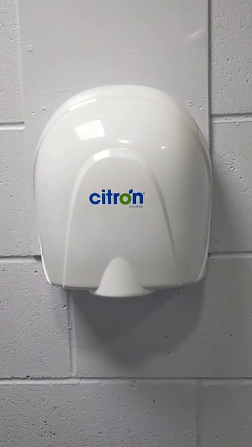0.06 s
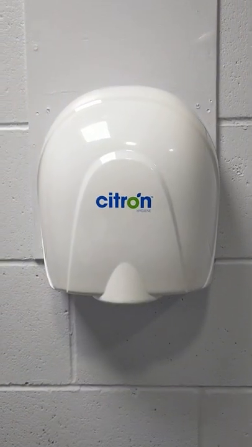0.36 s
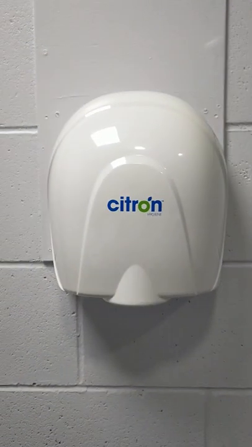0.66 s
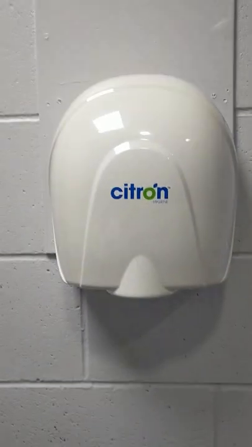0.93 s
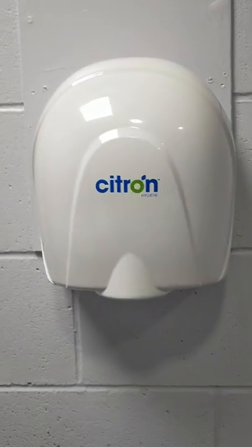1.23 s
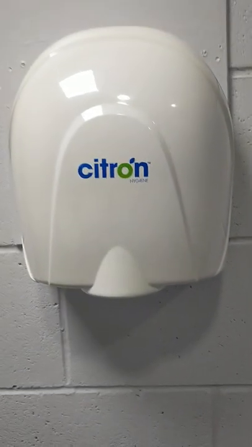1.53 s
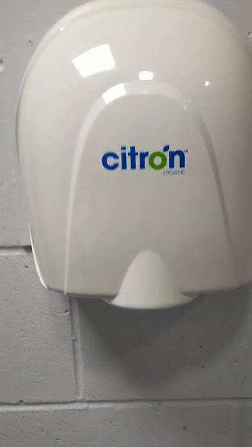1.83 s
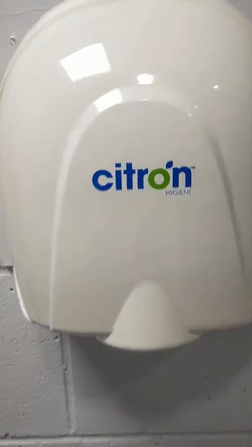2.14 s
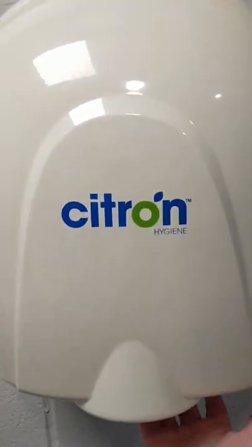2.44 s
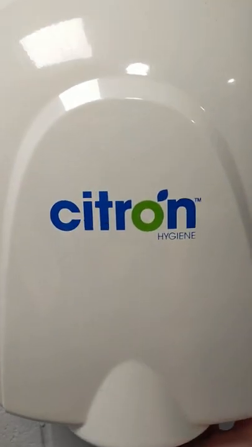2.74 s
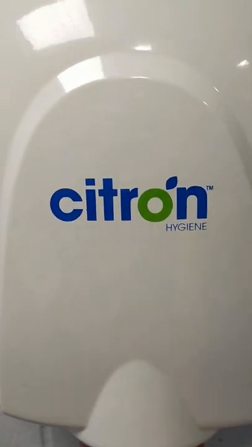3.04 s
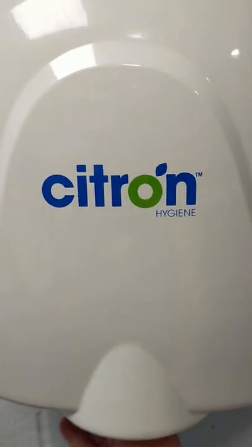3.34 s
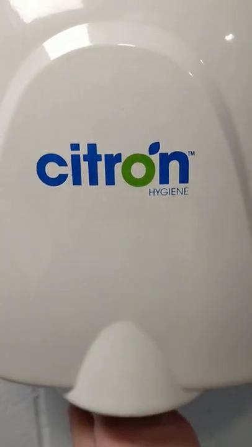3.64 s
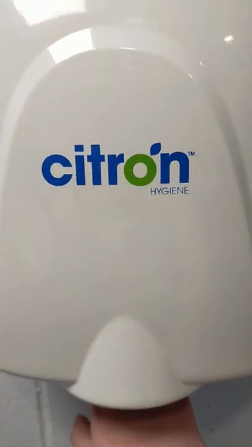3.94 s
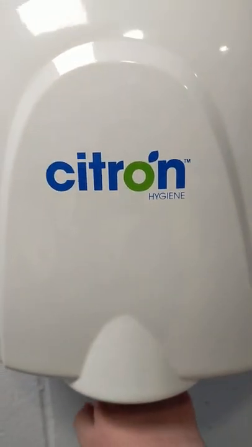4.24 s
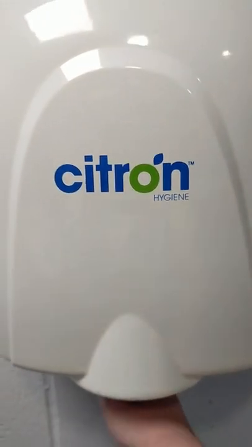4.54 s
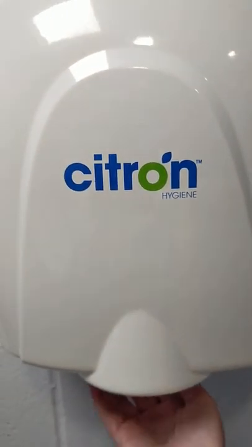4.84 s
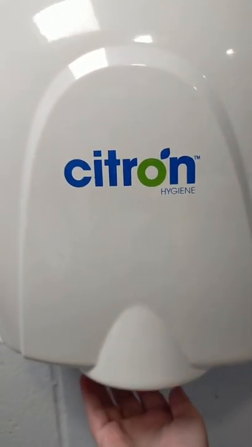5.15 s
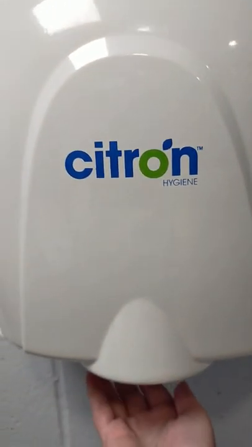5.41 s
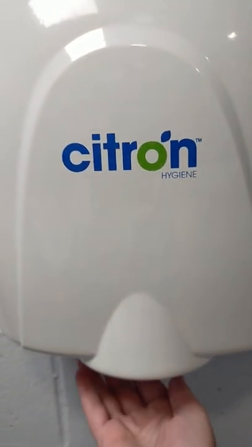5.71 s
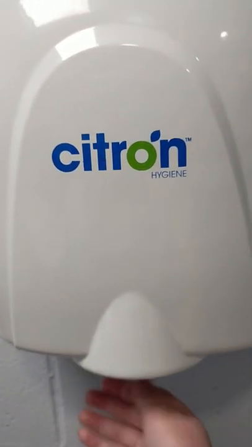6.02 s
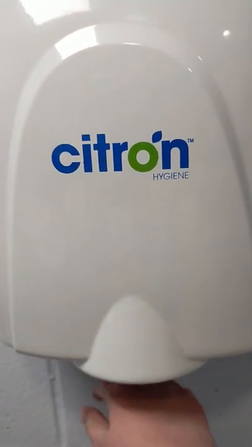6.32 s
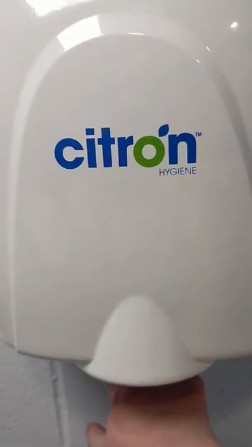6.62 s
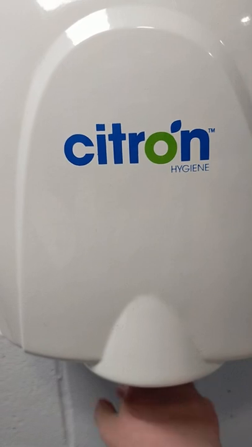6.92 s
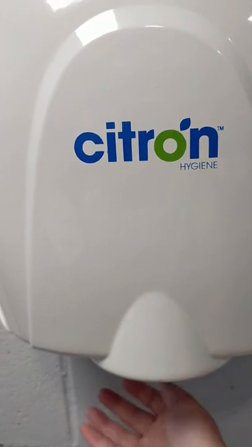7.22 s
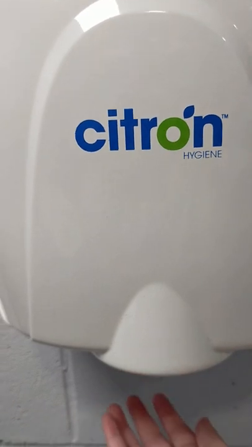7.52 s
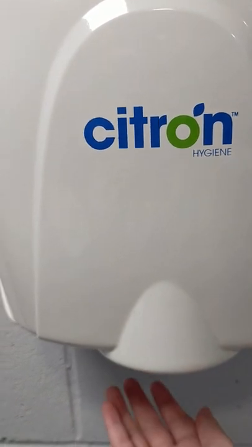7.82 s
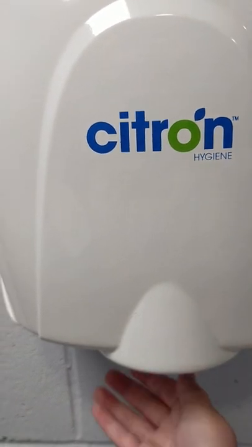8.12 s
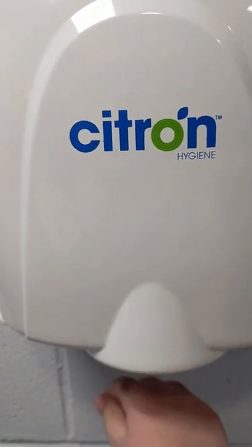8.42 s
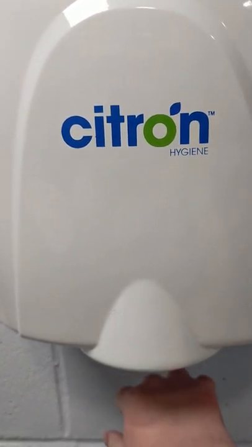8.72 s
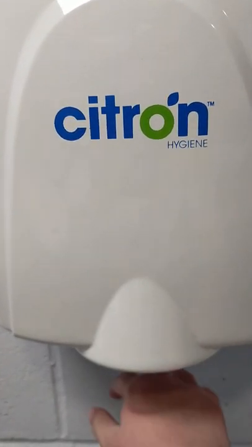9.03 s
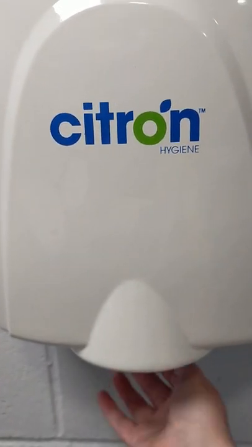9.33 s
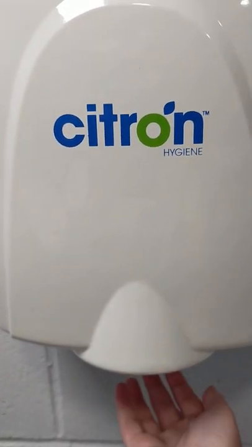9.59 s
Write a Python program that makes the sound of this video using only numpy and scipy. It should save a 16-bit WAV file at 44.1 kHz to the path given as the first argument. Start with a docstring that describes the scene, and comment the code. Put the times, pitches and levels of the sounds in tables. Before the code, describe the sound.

An electric hand dryer clicks on close to the microphone, after a short stretch of low washroom ventilation and soft clothing rustle. Its motor quickly whines up to a steady high pitch while the air builds to a loud, hissing roar with a thin whistle. The blast flares, dips and changes colour as a hand moves in it, with a short echo from the hard walls.

```python
"""Ventilation throbs in a quiet, block-walled washroom; clothes rustle and something squeaks as someone
steps up to an electric hand dryer, close and straight ahead of a mono microphone. A relay clicks, the
cover thumps, and the motor spins up with a rising whine to 414 turns a second. Its jet hisses through
the ringing nozzle and roars on a hand that turns and moves under it, while the microphone's gain
control pushes the room's throb down."""
import sys
import numpy as np
from scipy import signal
from scipy.fft import rfft, irfft, next_fast_len
from scipy.io import wavfile
from scipy.ndimage import uniform_filter1d, map_coordinates

SR = 44100
rng = np.random.default_rng(int(sys.argv[2]) if len(sys.argv) > 2 else 0)


def dump_mix(stems):
    """Bounce the given channels to the path in sys.argv[1] as a 16-bit WAV at rate SR."""
    frames = np.atleast_2d(stems).T  # one column per channel
    limited = np.clip(frames, -1, 1)  # hard clip at full scale
    pcm = np.round(limited * 32767).astype(np.int16)
    wavfile.write(sys.argv[1], SR, pcm)


N = 434826
TIME = np.arange(N) / SR
SWITCH_S, FULL_SPEED_HZ = 2.4465, 414  # when the relay closes; the shaft's final turns per second
KNEE_HZ = 298  # shaft speed above which the air noise grows by a steeper power


def gain_of(db):
    """Decibels to amplitude."""
    return np.exp(np.asarray(db) * (np.log(10) / 20))


def unit_rms(x):
    """Scales to rms 1."""
    return x / np.sqrt(np.mean(x ** 2) + 1e-20)


def value_at(points, hz):
    """A spectrum's value at hz, on a log-frequency axis."""
    f, value = np.transpose(points)
    return np.interp(np.log(hz + 1), np.log(f + 1), value)


def follow(rows):
    """Each column of a timed table, sample by sample."""
    times, *columns = np.transpose(rows)
    return [np.interp(TIME, times, column) for column in columns]


def noise(shape):
    """Noise of rms 1 whose amplitude spectrum is shape(Hz)."""
    size = next_fast_len(N, True)
    spectrum = rfft(rng.standard_normal(size)) * shape(np.fft.rfftfreq(size, 1 / SR))
    return unit_rms(irfft(spectrum, size)[:N])


def coloured(points):
    """Noise of rms 1 with a spectrum shaped by (f/Hz, level/dB) points."""
    return noise(lambda hz: gain_of(value_at(points, hz)))


def ringing(modes):
    """Noise of rms 1 inside a set of resonances."""
    return noise(lambda f: np.sqrt(sum(gain_of(db) ** 2 / width / (1 + (2 * (f - hz) / width) ** 2) ** 2
                                       for hz, width, db in modes)))


def wander(rate_hz):
    """A random drift of rms 1, mostly slower than rate_hz."""
    steps = TIME[::64]
    hz = np.fft.rfftfreq(len(steps), steps[1])
    slow = irfft(rfft(rng.standard_normal(len(steps))) / (1 + (hz / rate_hz) ** 2), len(steps))
    return np.interp(TIME, steps, unit_rms(slow))


def swell(t, length):
    """A smooth bump of height 1 around time t, `length` wide at half height."""
    bump, near = np.zeros(N), abs(TIME - t) < 2 * length
    bump[near] = .5 ** ((2 * (TIME[near] - t) / length) ** 2)
    return bump


def resonate(x, hz, width_hz):
    """A resonance of gain 1 that can follow a moving frequency."""
    turn = np.exp(2j * np.pi * np.cumsum(hz * np.ones(N)) / SR)
    pole = np.exp(-np.pi * width_hz / SR)
    return 2 * (turn * signal.lfilter([1 - pole], [1, -pole], x / turn)).real


def bent(x, ratio, order=3):
    """Moves the pitch of a sound by a changing ratio."""
    return map_coordinates(x, [np.cumsum(ratio)], order=order, mode="wrap")


# Spectrum of the room's ventilation, then its treble at the grille: f/Hz, level/dB
VENT_SPECTRUM = [(20, -11), (70, 10.5), (110, 6), (180, 7), (310, 3.5), (420, -1.5), (720, -5),
                 (1250, -0.5), (1550, -2), (2100, 3), (2800, -0.5), (3400, -7.5), (3900, -11), (4700, -15),
                 (6600, -18)]
GRILLE_SPECTRUM = [(6900, -13), (7250, -8), (7700, -12), (8100, -11.5), (8900, -24), (11500, -22.5),
                   (14500, -16.5), (16000, -20)]
# The draught as the microphone moves toward the wall: t/s, duct level/dB, grille level/dB
DRAUGHT_LEVELS = [(0.0, -54.5, -56), (2.4, -57, -55.3)]
# Steady tones of the ventilation fans: f/Hz, level/dB
FAN_TONES = [(18.1, -57), (33.23, -48.5), (40.04, -49.5), (120, -65), (320, -67.5), (640, -74), (3811, -77),
             (7364, -79)]
def ventilation(split_hz=1400):
    """Duct rumble and grille hiss fill the room; the two loudest fan tones beat into a low throb."""
    duct_db, grille_db = follow(DRAUGHT_LEVELS)
    whole_spectrum = VENT_SPECTRUM + GRILLE_SPECTRUM
    duct = noise(lambda hz: gain_of(value_at(VENT_SPECTRUM, hz)) / np.hypot(1, (hz / split_hz) ** 4))
    grille = noise(lambda hz: gain_of(value_at(whole_spectrum, hz))
                   / np.hypot(1, (split_hz / (hz + 1)) ** 4))
    hum = sum(gain_of(db) * np.sin(2 * np.pi * (hz * TIME + rng.random())) for hz, db in FAN_TONES)
    return gain_of(duct_db + 0.5) * duct + gain_of(grille_db) * grille + np.sqrt(2) * hum


# Rustles on the way to the dryer: t/s, rise/s, fall/s, level/dB, share of fizz (0-1)
CLOTH_RUSTLES = [(.4, .08, 0.14, -60, .9), (1.08, .14, 0.078, -67, .9), (1.411, .002, 0.08, -50, 0.4),
                 (1.56, .08, .07, -58, 0.5), (1.78, .1, 0.31, -59.5, .2)]
# Spectra of the cloth's coarse rubbing and fine fizz: f/Hz, level/dB
RUBBING_SPECTRUM = [(600, -16), (2300, 4), (3000, -1), (3550, 2), (4400, -6), (6000, -10), (7600, -7),
                    (9500, -16), (16000, -14)]
FIZZ_SPECTRUM = [(3000, -30), (7500, -5), (9500, -10), (12000, -6), (14500, 2), (16000, -4)]
def clothes(grain_db=2):
    """Cloth rubs in short, grainy swishes near the microphone."""
    rubbing, fizz = np.zeros((2, N))
    for t, rise, fall, db, share in CLOTH_RUSTLES:
        attack = np.clip((TIME - t) / rise, 0, 1)
        swish = gain_of(db) * attack * np.exp(-np.maximum(TIME - t - rise, 0) / fall)
        rubbing += (1 - share) * swish
        fizz += share * swish
    grain = gain_of(grain_db * wander(rate_hz=90))
    return grain * (rubbing * coloured(RUBBING_SPECTRUM) + fizz * coloured(FIZZ_SPECTRUM))


# Faint squeaks, perhaps of a shoe, on the way to the dryer: t/s, length/s, f/Hz, level/dB
FAINT_SQUEAKS = [(1.47, .05, 3450, -67), (1.87, .04, 3680, -66)]
def squeaks(waver_hz=45):
    """Short, unsteady stick-slip tones."""
    waver = np.cumsum(waver_hz * wander(rate_hz=60)) / SR
    return np.sqrt(2) * sum(gain_of(db) * swell(t, length) * np.sin(2 * np.pi * (hz * TIME + waver))
                            for t, length, hz, db in FAINT_SQUEAKS)


def running():
    """Zero until the relay closes, then a quick ramp to one."""
    return np.clip((TIME - SWITCH_S) / 0.0052, 0, 1)


# Modes of the dryer's cover: f/Hz, level/dB, t60/s
COVER_MODES = [(212, -27.5, 0.51), (302, -37, 0.3), (1160, -34, 0.2), (1400, -38, .08), (3284, -48, .15),
               (3560, -43, 0.11)]
def switch_on(click_db=-22.5, click_t60=0.023):
    """The relay snaps shut and the motor's first kick rings the cover."""
    age = np.maximum(TIME - SWITCH_S, 0)
    snap = coloured([(300, -12), (1200, 6), (4000, 3), (6000, -7), (7600, 8), (9000, -16),
                     (11500, -14), (13200, 1), (16000, 6)])  # f/Hz, level/dB
    click = gain_of(click_db - 60 * age / click_t60) * snap * (age > 0)
    cover = sum(gain_of(db - 60 * age / t60) * np.sin(2 * np.pi * hz * age)
                for hz, db, t60 in COVER_MODES)
    return click + running() * cover


def shaft_speed(pull_s=.1, settle_s=.32, pull_share=.45):
    """Turns per second: the motor pulls up quickly, then settles against the drag of the air."""
    age = np.maximum(TIME - SWITCH_S, 0)
    shortfall = pull_share * np.exp(-age / pull_s) + (1 - pull_share) * np.exp(-age / settle_s)
    return FULL_SPEED_HZ * (1 - shortfall)


# Jerks of the rotor as it breaks loose: t/s, level/dB, t60/s
ROTOR_JERKS = [(2.449, -35.5, 0.34), (2.498, -36, 0.33)]
# Spectrum of the scraping air and brushes: f/Hz, level/dB
SCRAPE_SPECTRUM = [(400, -16), (1100, 3), (1500, 1), (2000, -10), (2900, 1), (3800, -8), (6000, -15),
                   (16000, -22)]
def rotor_start(squeal_db=-43, squeal_hz=13500, squeal_width_hz=3500, segments=24):
    """The brushes scrape; overtones of the commutator's segments squeal up through the treble."""
    scrape = sum((TIME > t) * gain_of(db - 60 * np.maximum(TIME - t, 0) / t60)
                 for t, db, t60 in ROTOR_JERKS)
    squeal = np.zeros(N)
    for harmonic in (3, 4, 5):
        hz = harmonic * segments * shaft_speed()
        height = np.exp(-np.minimum((2 * (hz - squeal_hz) / squeal_width_hz) ** 2, 20))
        squeal += height * np.cos(2 * np.pi * np.cumsum(hz) / SR)
    return scrape * coloured(SCRAPE_SPECTRUM) + gain_of(squeal_db) * squeal


# The motor's tones: multiple of the shaft speed, relative level/dB
SHAFT_TONES = [(1, -38), (2, -45.5), (3, -40.5), (4, -39), (5, -44), (7, -47), (9, -46.5), (12, -48),
               (14, -52.5), (15, -49)]
# Resonances of the housing around it: f/Hz, width/Hz, lift/dB
HOUSING_MODES = [(182.2, 71, 12), (338, 49, 14.5), (2060, 150, 6.5)]
def motor(jitter_hz=0.709, flutter_db=2.0, trim_db=-1):
    """Shaft tones, slightly unsteady, swell as they sweep through the housing's resonances."""
    speed = shaft_speed()
    angle = 2 * np.pi * np.cumsum(speed + jitter_hz * wander(rate_hz=7.96)) / SR
    tones = np.zeros(N)
    for multiple, db in SHAFT_TONES:
        lift_db = sum(lift / (1 + (2 * (multiple * speed - hz) / width) ** 2)
                      for hz, width, lift in HOUSING_MODES)
        tones += gain_of(db + lift_db + flutter_db * wander(rate_hz=6.3)) * np.cos(multiple * angle)
    return np.sqrt(2) * running() * gain_of(trim_db) * (speed / speed.max()) * tones


# How well the dryer's duct passes the blade tone to the microphone: f/Hz, relative level/dB
DUCT_RESPONSE = [(1000, -53), (1600, -41), (2100, -21), (2460, -22), (2700, -17.5), (2930, -30),
                 (3200, -34), (3580, -37), (3700, -52)]
def fan_whine(blades=9, roughness=0.94, width_hz=200):
    """The blade tone, frayed by the air it cuts, is loudest sweeping through the duct's resonance."""
    blade_hz = blades * shaft_speed()
    clean = np.sqrt(2) * np.cos(2 * np.pi * np.cumsum(blade_hz) / SR)
    band = resonate(rng.standard_normal(N), blade_hz, width_hz)
    frayed = unit_rms(resonate(band, blade_hz, 2 * width_hz))
    return gain_of(value_at(DUCT_RESPONSE, blade_hz)) * (clean + roughness * frayed) / np.hypot(1, roughness)


# The hollow between hand and nozzle: t/s, relative roar level/dB, nominal resonance f/Hz
HAND_HOLLOW = [(2.75, -24, 1731), (3.01, -22, 1540), (3.32, -19.5, 1990), (3.54, -20, 1648),
               (4.1, -21, 1680), (4.37, -21.5, 1901), (4.67, -23.5, 1609), (5.38, -25, 1781),
               (5.64, -21, 1581), (6.0, -24, 1780), (6.57, -21.5, 1450), (7.5, -27.5, 1660),
               (7.64, -24, 1542), (7.78, -23.5, 1730), (7.96, -21.5, 1378), (8.04, -23, 1610),
               (9.84, -25.5, 1590), (9.86, -24, 1625)]
# The palm cups the jet and booms: t/s, length/s, relative level/dB
PALM_CUPS = [(2.757, 0.13, -25), (3.042, 0.22, -24), (4.78, 0.3, -30), (5.152, 0.3, -30),
             (5.72, 0.31, -31.5), (6.46, 0.15, -27.5), (6.68, 0.24, -29.5), (7.925, 0.34, -27.5),
             (8.198, .12, -33), (8.399, 0.15, -26.5), (8.72, 0.22, -29.5), (9.05, 0.35, -31.5),
             (9.48, 0.17, -27)]
# Spectra of the roar on the hand and the boom in the palm: f/Hz, level/dB
ROAR_SPECTRUM = [(100, -40), (700, -26), (1000, -8.5), (1300, 1.5), (1700, 0), (2400, 0.5), (2900, -4.5),
                 (3500, -12), (5000, -27), (9000, -33)]
PALM_SPECTRUM = [(300, -26.5), (650, -16), (850, -5.5), (1020, 1), (1200, -3.5), (1500, -16.5), (3000, -33)]
def hand_roar(hollow_gain=1.94, hollow_tuning=1.012, bend_power=.45, palm_floor_db=-32, flutter_db=0.34):
    """The jet breaks up on the hand: the palm booms and the hollow drags the colour up and down."""
    roar_db, hollow_hz = follow(HAND_HOLLOW)
    cup_power = sum(gain_of(db) ** 2 * swell(t, length) for t, length, db in PALM_CUPS)
    air = bent(coloured(ROAR_SPECTRUM), (hollow_hz / hollow_hz.mean()) ** bend_power, order=1)
    hollow = unit_rms(air + hollow_gain * resonate(air, hollow_tuning * hollow_hz, width_hz=560))
    boom = np.sqrt(gain_of(palm_floor_db) ** 2 + cup_power) * coloured(PALM_SPECTRUM)
    return gain_of(flutter_db * wander(rate_hz=23)) * (gain_of(roar_db + 0.5) * hollow + boom)


# The jet grazes the fingers and flares: t/s, length/s, rush gain/dB, hiss gain/dB, whistle gain/dB
FINGER_GRAZES = [(2.73, 0.23, 3.5, -2.5, 0), (3.27, 0.21, 6.5, 2.5, -0.5), (4.201, .25, 1.5, 1, 0),
                 (4.604, .035, 4, 4, 1), (5.2, .12, 2, .5, 2), (6.3, 0.27, -0.5, -1.5, 0),
                 (7.17, .06, 0, 0, 3), (7.33, 0.063, -1, 0, 1), (7.79, 0.15, 1, 3.5, 0),
                 (8.71, 0.037, 3.5, 2, 1), (9.2, .14, 0, 1.2, 0)]
# Air spilling past the hand into the open room: t/s, relative level/dB
AIR_SPILL = [(2.6, 6), (2.85, 4), (3.35, 1), (3.7, -1.1), (4.7, 0.5), (5.05, 2.5), (5.4, 1.5), (5.75, -1),
             (6.8, -1), (7.1, 1.5), (7.6, 3), (8.1, 0.5), (8.9, -1), (9.3, 3), (9.86, -2)]
# Spectra of the jet's bright rush, top hiss and low buffeting: f/Hz, level/dB
RUSH_SPECTRUM = [(1000, -19.5), (2600, 2), (3100, 1), (3550, -1), (3800, 0), (4300, 1.5), (4950, -4),
                 (5350, 2), (5550, -1), (5780, 0.5), (6100, -5), (7000, -0.5), (9000, -22)]
HISS_SPECTRUM = [(3000, -21.5), (6500, -19), (9300, -9.5), (10800, -9), (11900, -9), (12500, -4),
                 (13900, -3.5), (14350, 2.5), (14800, 2), (15200, -6), (16000, -3)]
BUFFET_SPECTRUM = [(4, -26), (20, -26), (65, -15), (120, -13.5), (160, -8.5), (250, -8.5), (340, -5),
                   (480, -1), (700, -0.5), (1100, -8), (2500, -51)]
def air_stream(eddy_db=0.57, gust_db=0.9, opening_power=0.46):
    """Turbulent air leaves the nozzle; the same eddies shake its rush, its hiss and its whistles."""
    rush_db, hiss_db, whistle_db = sum(np.outer(gains_db, swell(t, length))
                                       for t, length, *gains_db in FINGER_GRAZES)
    spill_db = follow(AIR_SPILL)[0]
    rush = gain_of(-29 + rush_db + 0.12 * spill_db) * coloured(RUSH_SPECTRUM)
    hiss = gain_of(-23.5 + hiss_db + 0.24 * spill_db) * coloured(HISS_SPECTRUM)
    opening = np.clip(shaft_speed() / KNEE_HZ, 0, 1) ** opening_power  # treble opens after the roar
    bright = opening * (rush + hiss) + gain_of(whistle_db) * nozzle_whistles()
    buffet = gain_of(-33 + 1.02 * spill_db + gust_db * wander(rate_hz=9.5)) * coloured(BUFFET_SPECTRUM)
    return gain_of(eddy_db * wander(rate_hz=24)) * bright + buffet


# How hard the nozzle sings: t/s, relative level/dB of lower whistle, upper whistle and sheen,
# nominal f/Hz of the lower whistle
NOZZLE_SINGING = [(2.75, -32, -29.5, -33, 7250), (2.97, -35, -31.5, -46, 7230),
                  (3.42, -26.5, -28.5, -35, 7290), (4.19, -30.5, -27.5, -37, 7260),
                  (4.77, -27.5, -31.5, -33, 7167), (5.08, -26.5, -27.5, -32.5, 7215),
                  (5.68, -29, -30.5, -43.5, 7285), (6.39, -28, -28.5, -30, 7223),
                  (6.59, -28, -29, -37, 7244), (7.36, -27, -28.5, -36, 7350), (7.62, -26, -30, -31.5, 7280),
                  (7.92, -29, -31, -41, 7336), (8.85, -28, -31, -38, 7305), (9.64, -26.5, -28.5, -32, 7260),
                  (9.72, -31, -33, -41, 7300), (9.86, -25, -28, -27, 7360)]
# Nozzle resonances of the lower and the upper whistle: f/Hz, width/Hz, level/dB
LOWER_MODES = [(6710, 290, -10.5), (7110, 110, -4), (7330, 440, 2)]
UPPER_MODES = [(7990, 530, 0)]
# Sheen, the fan's breathy overtones at full speed: f/Hz, width/Hz, level/dB
SHEEN_BANDS = [(8750, 300, -1.5), (10140, 390, 0), (11450, 420, -1.5), (12550, 400, -13)]
def nozzle_whistles(onset_power=1.6, climb_power=2.1):
    """The nozzle sings once the air is fast enough; breathy overtones climb with the fan's pressure."""
    lower_db, upper_db, sheen_db, lower_hz = follow(NOZZLE_SINGING)
    speed = shaft_speed()
    lower = gain_of(lower_db) * bent(ringing(LOWER_MODES), lower_hz / lower_hz.mean())
    upper = gain_of(upper_db + 0.7) * ringing(UPPER_MODES)
    climb = abs(speed / FULL_SPEED_HZ) ** climb_power
    sheen = gain_of(sheen_db - 1.5) * bent(ringing(SHEEN_BANDS), climb)
    return np.clip(speed / KNEE_HZ, 0, 1) ** onset_power * (lower + upper + sheen)


# Turns of the hand under the nozzle: t/s, length/s, gain/dB
HAND_TURNS = [(4.17, .14, 1), (4.678, 0.092, -1.5), (4.81, .1, 1), (5.324, 0.048, -2.5),
              (5.978, 0.051, -0.5), (6.847, 0.064, -2.5), (7.234, .08, -3.5), (7.44, 0.1, -2),
              (7.98, 0.079, -0.5), (8.25, .25, 0.9), (9.3, .12, -2), (9.77, 0.071, -1)]
def hand_turning():
    """Gain of the blast, which drops or swells as the hand turns in the jet."""
    return gain_of(sum(db * swell(t, length) for t, length, db in HAND_TURNS))


# Decay between the block walls: f/Hz, t60/s
ROOM_DECAY = [(100, 0.63), (1000, 0.55), (4000, 0.37), (15000, 0.32)]
def washroom(x, wet_db=-10, gap_s=.004):
    """Close up the direct sound leads; hard walls add a short, dense tail, the treble dying first."""
    hz, t, spectra = signal.stft(rng.standard_normal(SR // 2), SR, nperseg=256)
    decay = gain_of(-60 * t / value_at(ROOM_DECAY, hz)[:, None])
    tail = signal.istft(spectra * decay, SR, nperseg=256)[1]
    tail *= np.arange(len(tail)) / SR > gap_s
    reflections = signal.fftconvolve(x, tail / np.linalg.norm(tail))[:N]
    wet = gain_of(wet_db)
    return (x + wet * reflections) / np.hypot(1, wet)


def scene(flow_power=2.6, surge_power=3.15):
    """The washroom at one microphone facing the dryer; air noise grows as a power of shaft speed."""
    pace = shaft_speed() / KNEE_HZ
    flow = np.clip(pace, 0, 1) ** flow_power
    surge = np.maximum(pace, 1) ** surge_power
    air = flow * surge * (hand_turning() * (hand_roar() + air_stream()) + fan_whine())
    in_room = washroom(air + switch_on() + rotor_start() + clothes())
    mono = in_room + surge * motor() + ventilation() + squeaks()
    return np.array([mono, mono])


def record(dry, limit_db=-17.0, recovery_db_per_s=0.9, cutoff_hz=15750):
    """The microphone's gain control holds the dryer's level and ducks the throb; a low-pass follows."""
    power_db = 10 * np.log10(abs(uniform_filter1d(dry[0] ** 2, size=SR // 5)) + 1e-12)
    recovery_db = TIME * recovery_db_per_s
    held_db = np.maximum.accumulate(power_db + recovery_db) - recovery_db
    over_db = np.maximum(held_db - limit_db, 0)
    lowpass = signal.firwin(801, cutoff_hz, window=("kaiser", 9), fs=SR)
    return signal.oaconvolve(dry / gain_of(over_db), lowpass[None], "same", axes=1)


dry = scene()
out = record(dry)
dump_mix(out)
```